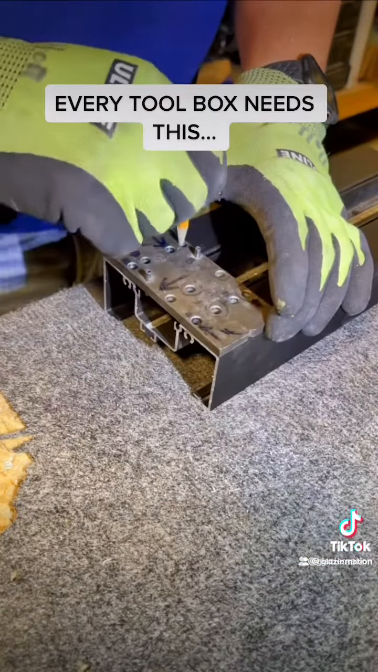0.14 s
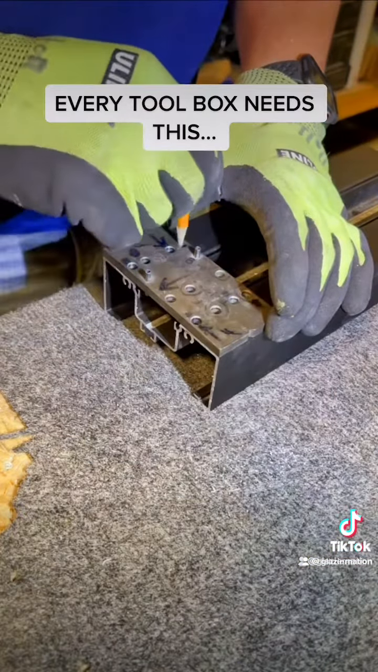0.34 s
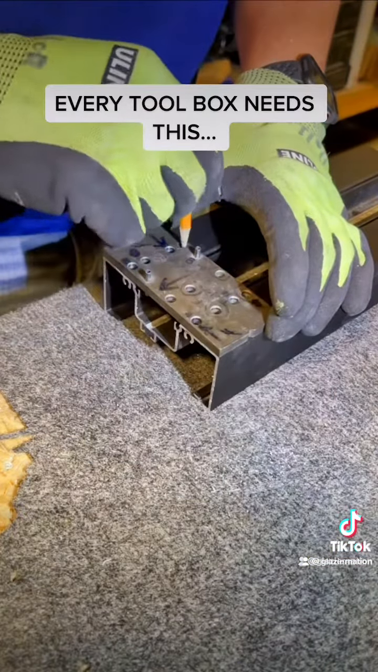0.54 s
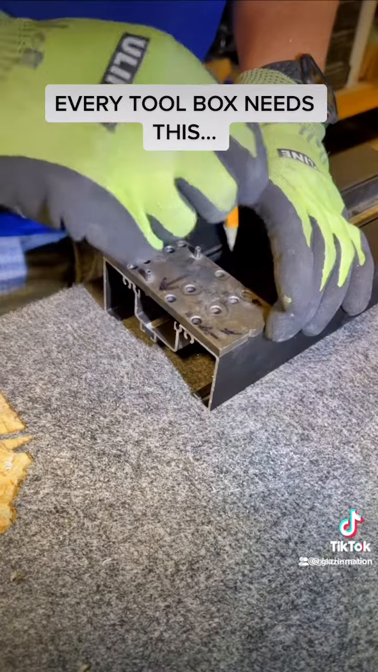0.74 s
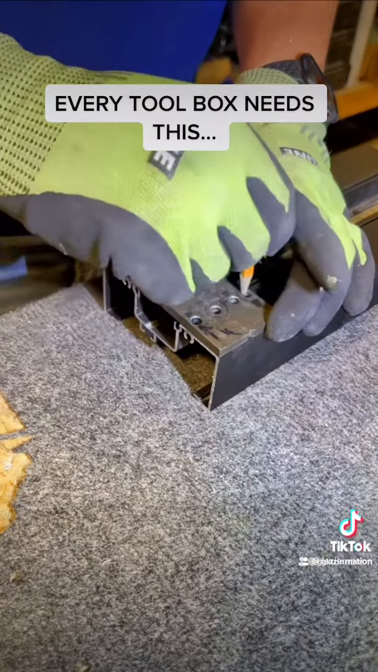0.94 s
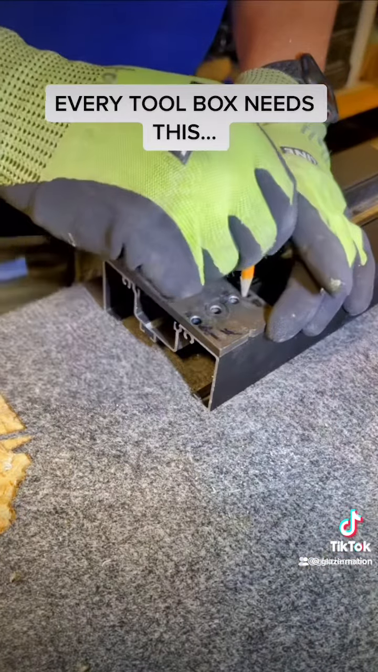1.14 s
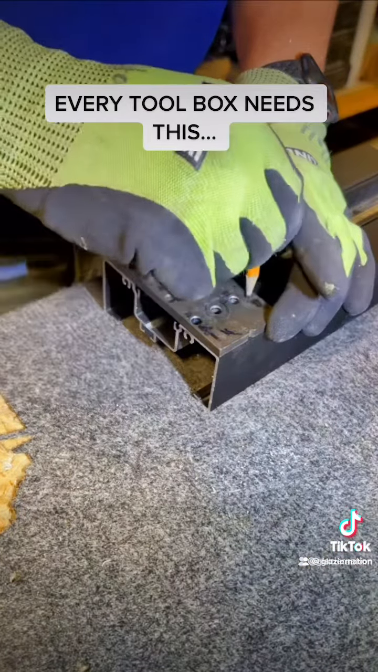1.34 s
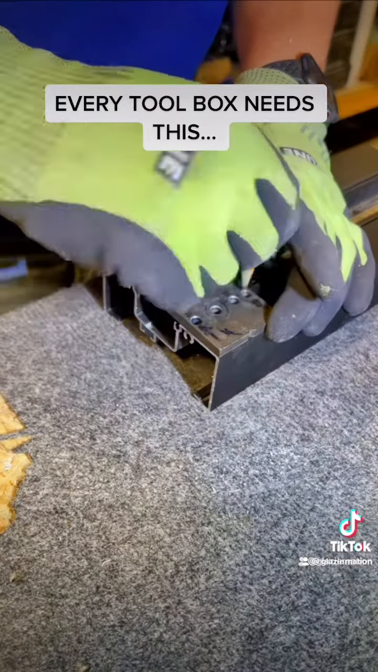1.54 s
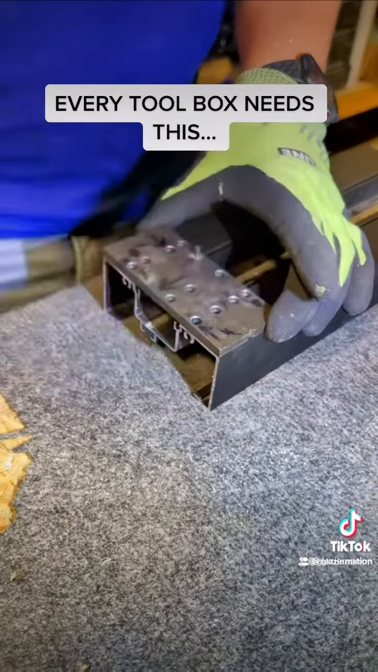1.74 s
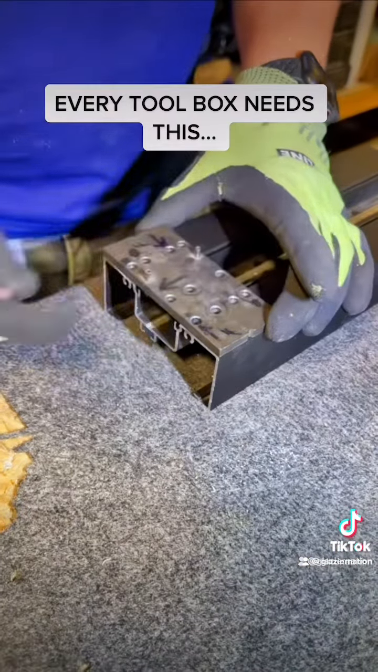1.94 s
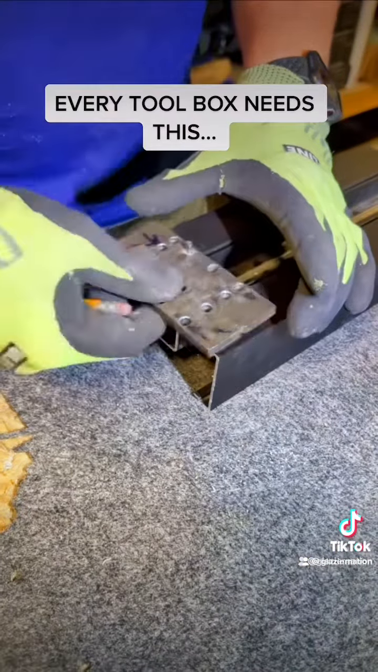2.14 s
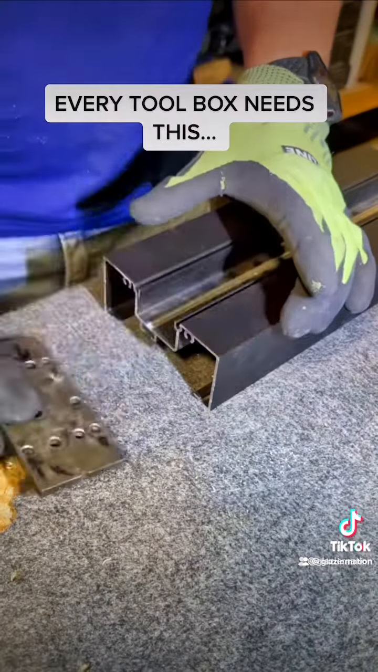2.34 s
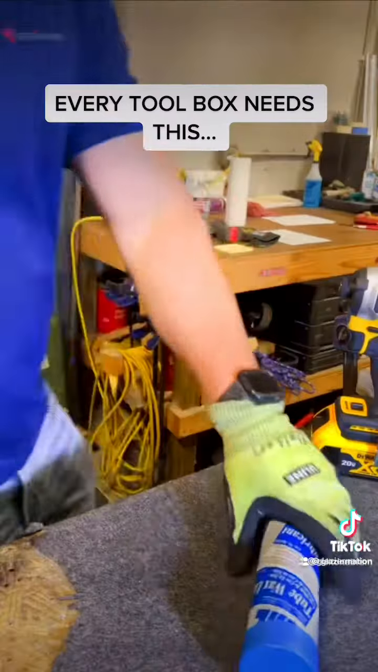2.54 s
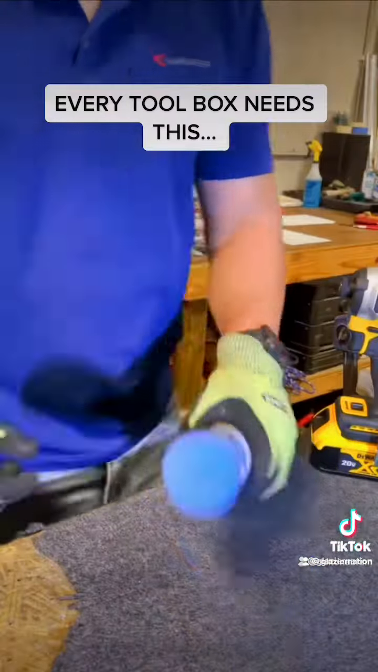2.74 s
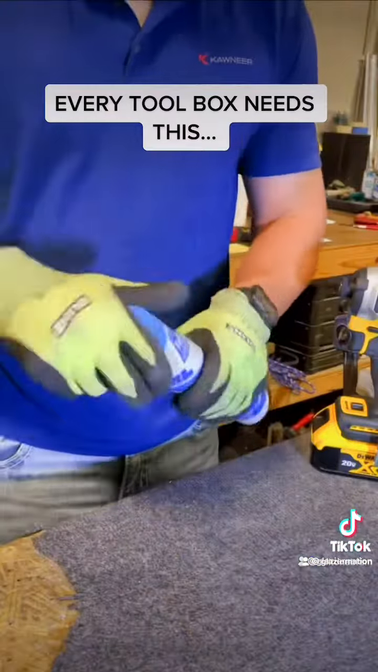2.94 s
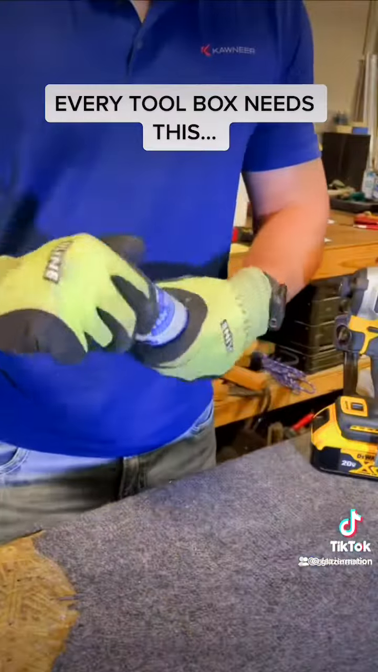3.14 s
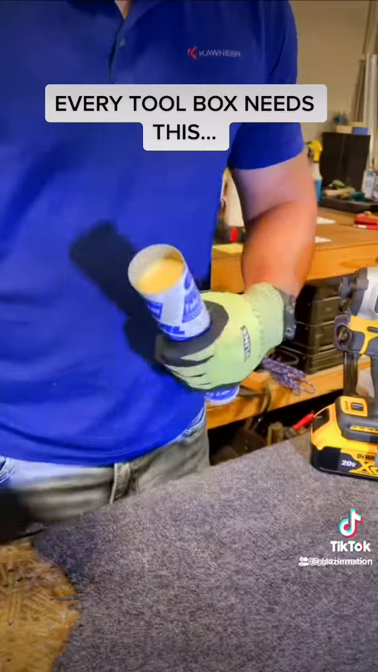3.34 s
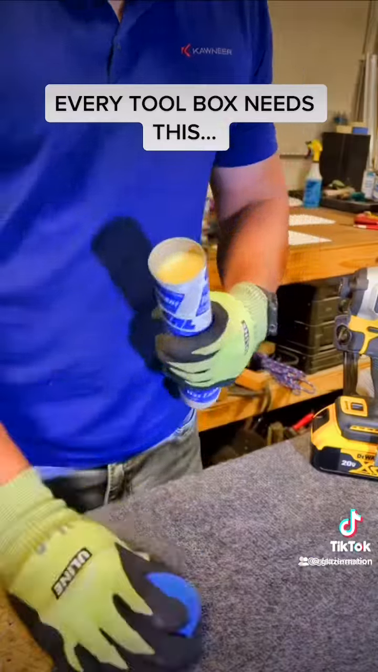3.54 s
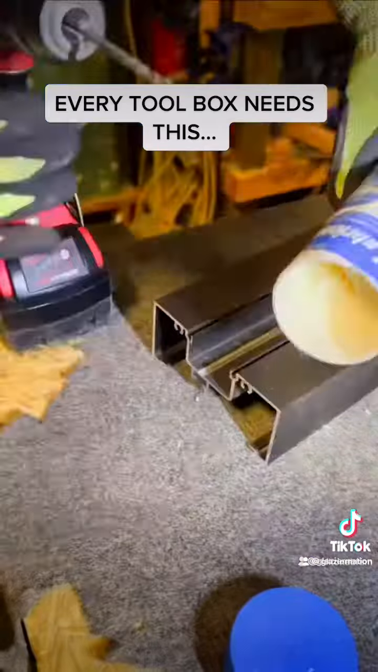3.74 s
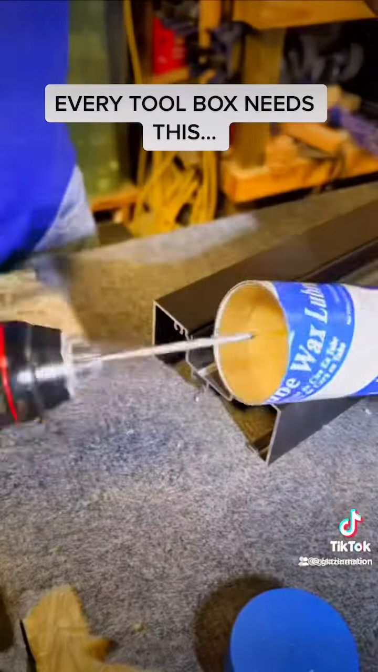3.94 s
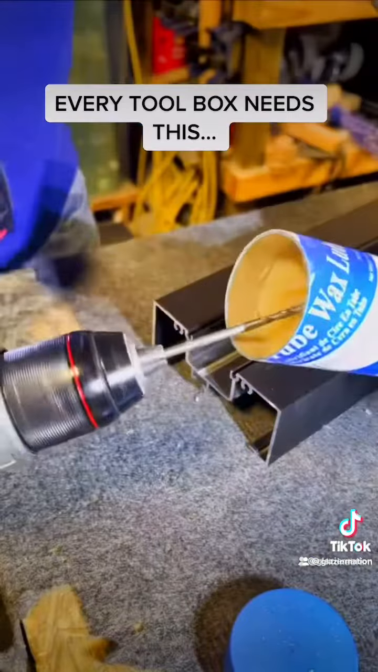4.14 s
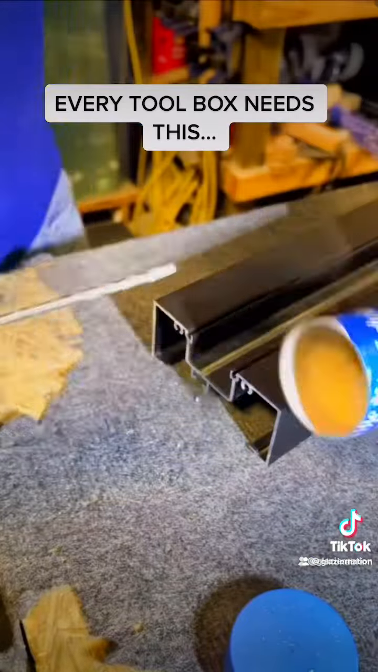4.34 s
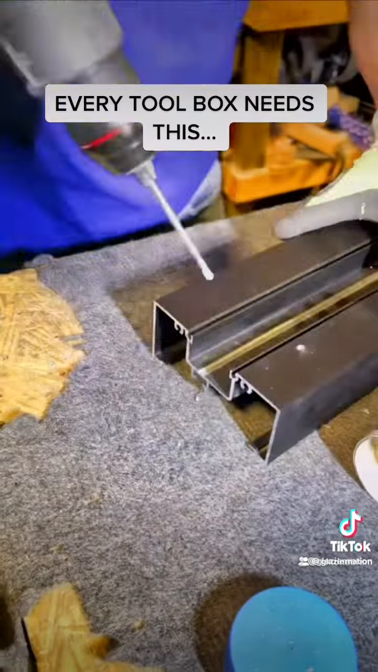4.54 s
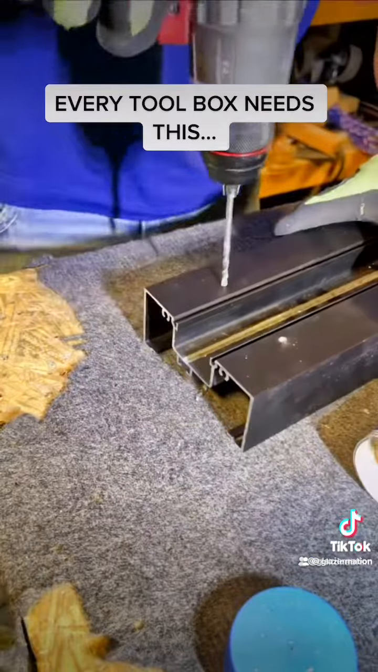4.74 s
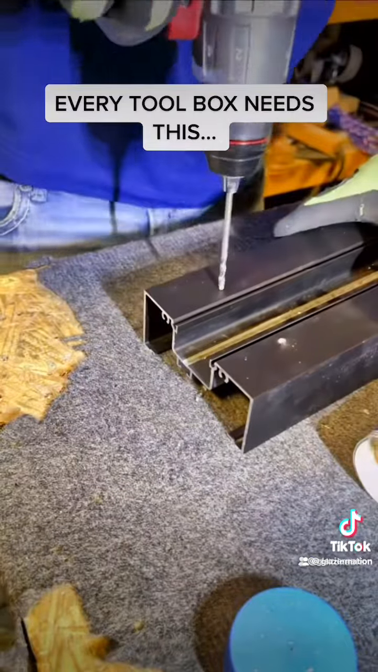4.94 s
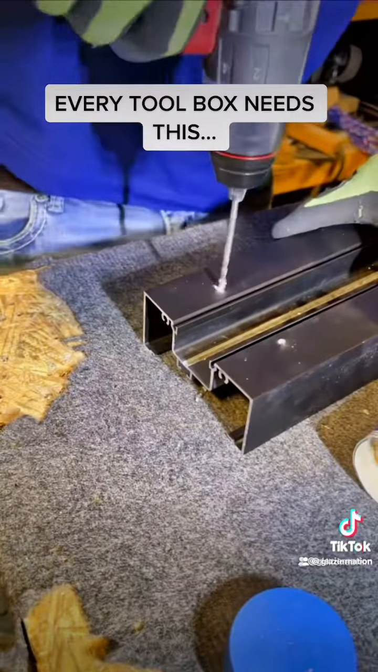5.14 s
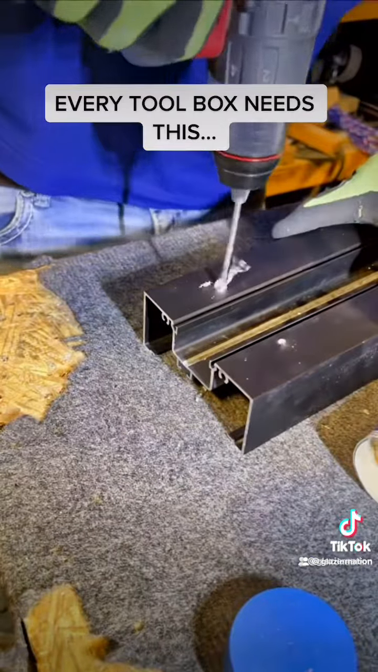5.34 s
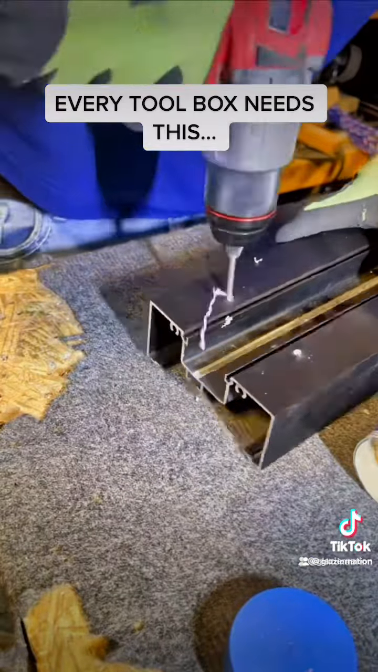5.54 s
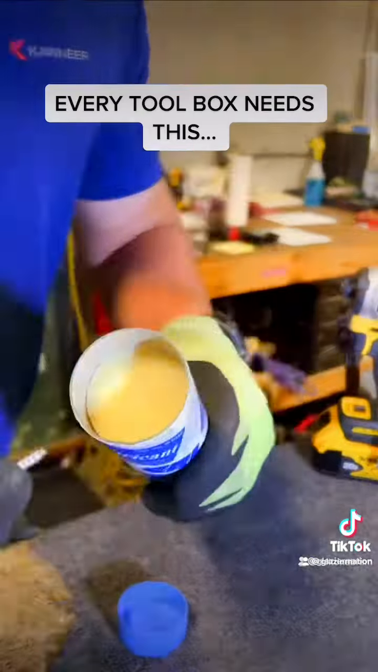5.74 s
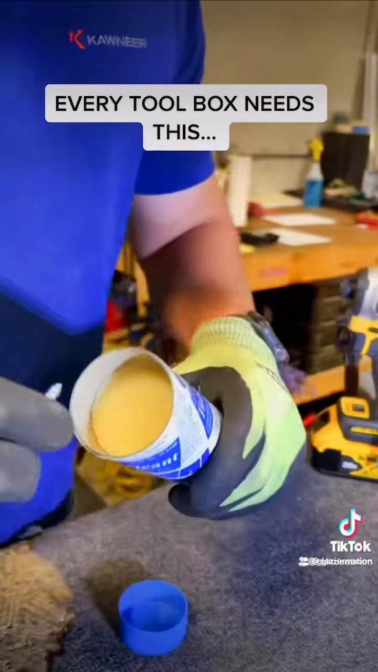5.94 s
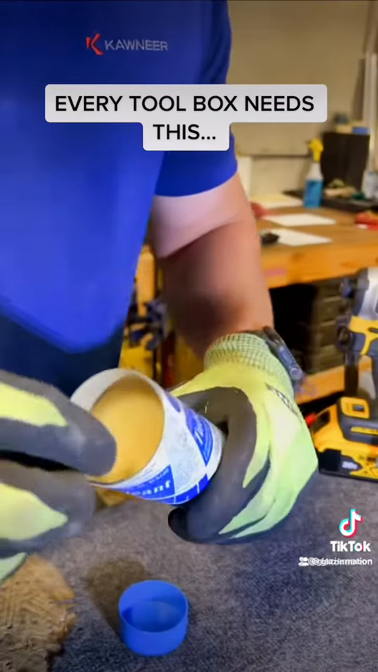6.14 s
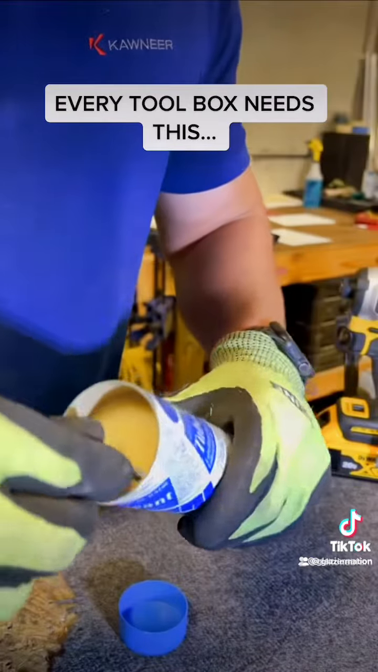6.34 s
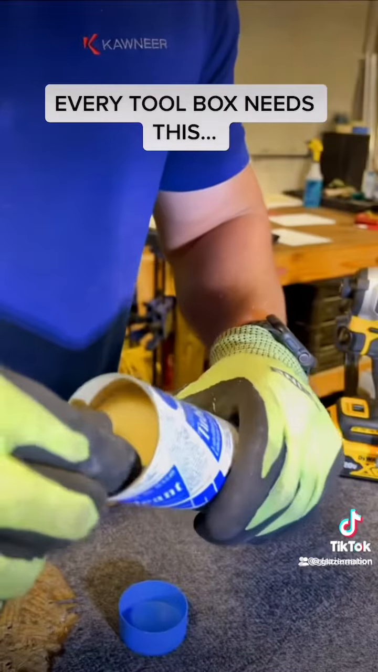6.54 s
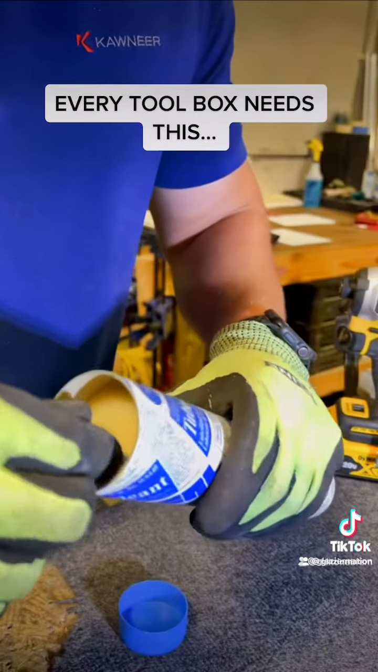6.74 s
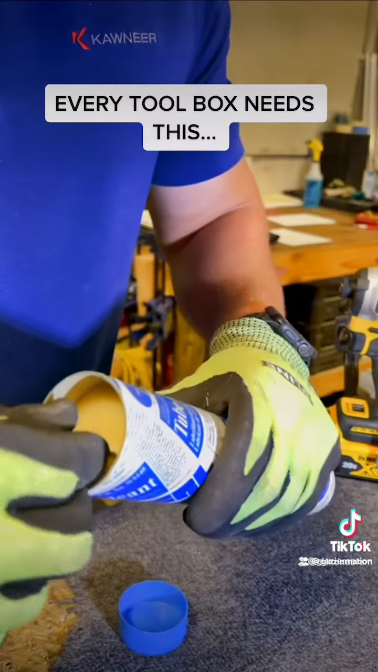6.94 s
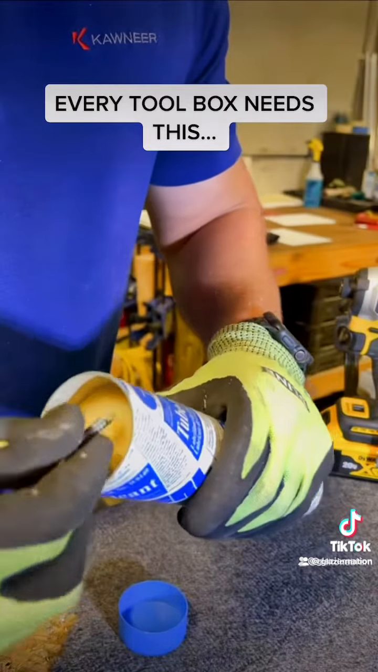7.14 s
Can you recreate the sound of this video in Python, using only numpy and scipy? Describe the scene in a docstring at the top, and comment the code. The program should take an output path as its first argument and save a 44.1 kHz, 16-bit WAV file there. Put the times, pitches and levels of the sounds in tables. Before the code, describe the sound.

In a quiet workshop, a pen scratches steel, a tube cap thumps open, and a drill spins briefly, then bores harshly through metal.

```python
"""A marker is heard first, scratching through a steel template on an aluminium profile; the template clatters off.
Gloves handle a tube of wax and pop its cap; a drill spins in the wax, is set on the metal and bores a hole.
A few small ticks follow as something is pushed into the wax, and the workshop hums underneath.
Friction is made of random micro-slips through spectra or resonances, the drill's whine of tones tied
to motor speed, the clatter of decaying metal modes, knocks of short low cycles and snaps of dispersed clicks."""
import sys
import numpy as np
from scipy import signal
from scipy.fft import rfft, irfft
from scipy.io import wavfile

SR = 44100
rng = np.random.default_rng(int(sys.argv[2]) if len(sys.argv) > 2 else 0)


def persist_wave(psi):
    """Save psi, clipped to +-1, as 16-bit WAV."""
    counts = np.round(np.clip(psi, -1, 1) * 32767).astype(np.int16)
    wavfile.write(sys.argv[1], SR, np.atleast_2d(counts).T)


N = 317520
TIME = np.arange(N) / SR
FREQS = np.maximum(np.fft.rfftfreq(N, 1 / SR), 1)

SWITCH_HZ = 7930  # switching rate of the drill's speed controller
CARRIER_RATIO, CHUCK_RATIO = 4, 13.5  # motor turns per turn of the first planet carrier and of the chuck
JERK_S = 0.0051
SHOP_T60_S = .18
CUTOFF_HZ = 15900

# Drill running free, spinning up slowly before the bit bites, boring: t/s, motor speed/(turns per s), gear tone
# level/dB, rasp level/dB
FREE_RUN = [(4.02, 374, -56, -39), (4.03, 368, -39, -31), (4.062, 376, -48, -26.5), (4.095, 393, -29, -27),
            (4.15, 390, -46, -25.5), (4.21, 390, -35.5, -26.5), (4.235, 380, -53, -28.5)]
SPIN_UP_RUN = [(4.925, 134, -55, -42), (4.94, 174, -50.5, -31), (4.985, 130, -55.5, -31.5)]
BORING_RUN = [(4.979, 290.9, -46.5, -36.5), (4.986, 372.3, -34, -24), (5.04, 425.1, -39, -20),
              (5.075, 428.6, -28, -20.5), (5.11, 407.6, -37.5, -19.5), (5.15, 386.6, -34, -21),
              (5.35, 373.7, -39, -21.5), (5.455, 361, -32, -22), (5.5, 333.7, -40, -23),
              (5.57, 348.8, -46, -18), (5.665, 282, -55, -23.5)]
# Gear tones free and under load: multiple of motor speed, level/dB, wobble/(share of f)
GEAR_FREE = [(7.5, -21.5, .012), (7.75, -24, .01), (8, -3.5, 0.0033)]
GEAR_LOADED = [(.5, -9, .008), (2, -2, 0.00051), (5.25, -2, .022), (5.5, -12.5, .014), (7, -2.5, 0.0049),
               (8, -4, .003), (9.25, -2.5, .014), (10, -8.5, 0.0147)]
# Controller tones: multiple of switching rate, offset/(multiple of motor speed), level/dB
SING_FREE = [(1, -1, -30), (1, 0, -34.5), (1, .5, -46.5), (1, 1, -34), (1, 2, -56.5), (2, -1, -42.5)]
SING_LOADED = [(1, 2, -51.5), (2, -2, -43.5)]
# Housing resonances: f/Hz, half width/Hz, level of the added tone/dB
HOUSING = [(874, 31, 0), (1985, 70, 8), (3006, 110, 19), (8774, 69, 20.5)]
# Direction of the drill: f/Hz, left-right level/dB
DRILL_PAN = [(150, -1.5), (380, 2.5), (700, 6.5), (1290, 3.5), (2400, 3), (4400, 9.5), (8100, 0),
             (15000, 0.5)]
# The bit grabs as it breaks through: t/s, length/s, level/dB
GRABS = [(5.463, .047, -22), (5.605, 0.021, -20.5)]
# Skids of the bit, and one groan on the way: t/s, length/s, level/dB
SKIDS = [(4.722, 0.075, -41.5), (4.802, .04, -42), (4.847, .008, -37)]
GROAN = (4.768, .022, -34.5)
# Marker strokes: t/s, length/s, level/dB
STROKES = [(.155, 0.029, -64), (.21, 0.044, -61), (.275, 0.13, -54), (.43, 0.11, -55), (.555, 0.063, -54),
           (.645, 0.017, -51.5), (.99, 0.083, -56), (1.1, 0.12, -54), (1.24, .14, -55.5),
           (1.42, 0.052, -54), (1.525, 0.017, -52)]
# Template drags, and the slide of the cap: t/s, length/s, level/dB
DRAGS = [(2.066, 0.021, -32.5), (2.101, 0.024, -29)]
CAP_SLIDE = (3.186, 0.019, -31)
# Glove rubs: t/s, length/s, hiss level/dB, shuffle level/dB
RUBS = [(1.84, 0.037, -57, -58), (1.9, 0.012, -48, -58), (2.39, 0.28, -63.5, -63), (2.72, 0.17, -49, -50.5),
        (2.945, 0.09, -57, -52.5), (3.07, 0.076, -57, -51), (3.22, 0.11, -62.5, -60.5),
        (3.42, 0.046, -64, -65), (3.495, 0.088, -58, -55), (3.77, 0.11, -57.5, -59.5),
        (4.41, 0.041, -62, -53.5), (4.495, 0.047, -58.5, -61), (4.582, 0.021, -44, -49),
        (5.69, 0.071, -61.5, -56), (5.778, 0.044, -46, -53), (5.83, 0.045, -68, -68), (5.9, .18, -56, -55),
        (6.09, 0.17, -78, -55.5)]
# Creak of the tube: t/s, length/s, level/dB; small jerks of the wax: t/s, level/dB
CREAK = (5.5, 0.153, -54)
JERKS = [(6.072, -36), (6.156, -39), (6.207, -39), (6.248, -41.5)]
# Contacts of template and profile: t/s, level/dB
CONTACTS = [(2.07, -31), (2.073, -45), (2.08, -22.5), (2.102, -33), (2.108, -22.5), (2.115, -32)]
# Modes of template on profile: f/Hz, level/dB, decay by 60 dB/s
METAL_MODES = [(275, -9, .12), (520, -12, .06), (931, -3, .06), (1109, -3, .075), (1620, -13, .07),
               (1852, -11, .08), (1960, -9, .05), (2353, -13, .1), (2719, -21, .1), (2950, -18, .08),
               (3195, -30, .42), (3445, -13, .07), (4124, -25, .06), (5200, -32, .15), (6230, -23, .1),
               (7000, -21, .05), (13600, -31, .08)]
# Knocks on tube and bench: t/s, peak level/dB, f/Hz, swell/s
KNOCKS = [(1.622, -34.5, 75, 0.0087), (2.326, -31, 146.7, 0.013), (2.348, -25, 127, .007),
          (2.377, -30, 64, 0.0067), (2.549, -34, 118, 0.0081), (2.753, -25.5, 168, 0.0044),
          (2.773, -31, 210, 0.0053), (2.838, -32, 126, .0065), (3.177, -23, 131, 0.011),
          (3.2, -7, 174.6, 0.0035), (3.827, -20, 139, 0.0038), (4.43, -18, 157, .0034),
          (4.898, -33, 140, .0047), (4.985, -31, 140, .008), (6.018, -30, 64, 0.0069),
          (6.334, -32.5, 127, 0.011), (6.421, -30, 85.5, .0064), (6.6, -33, 69.9, 0.0067),
          (7.185, -32, 76, 0.0076)]
# Ticks and snaps: t/s, peak level/dB, brightness f/Hz
TICKS = [(.091, -41, 1300), (.655, -46, 5000), (0.981, -36.5, 3760), (1.537, -51, 6000), (1.909, -36, 9000),
         (2.083, -33, 3960), (2.311, -46.5, 7000), (2.561, -41, 2460), (2.864, -37, 3000),
         (2.952, -37, 1490), (3.198, -16, 1084), (3.53, -49, 1490), (3.665, -47, 1500), (3.776, -38, 6060),
         (3.827, -42, 1800), (4.231, -13, 4970), (4.583, -46, 3500), (4.849, -47, 2480),
         (5.957, -35.5, 4500), (5.99, -38, 4500), (6.03, -32.5, 3450), (6.066, -35, 3940),
         (6.436, -52.5, 3000)]
# Short slides and catches of metal and plastic: t/s, level/dB, half length/s, centre f/Hz
SCRAPES = [(0.099, -42, 0.0064, 414), (.982, -35.5, 0.0039, 1070), (2.079, -25.5, 0.0034, 1260),
           (2.109, -30, .011, 1000), (2.619, -51.5, 0.011, 520), (2.794, -42, 0.024, 450),
           (2.857, -41.5, .014, 423), (2.954, -43.5, 0.006, 657), (3.492, -40.5, .005, 1970),
           (3.539, -38.5, .009, 450), (4.235, -24, 0.0053, 910), (4.589, -47.5, 0.012, 1340),
           (4.85, -54, 0.0034, 1610), (4.988, -16, 0.0019, 3000), (5.658, -17.5, 0.0045, 3000)]
# Background: t/s, hum level/dB, deep rumble level/dB
HUM = [(0, -52, -49.5), (1.95, -52, -55), (2.4, -46.5, -54), (2.75, -50, -48), (3.2, -49.5, -53),
       (3.8, -47, -57), (4.15, -55.5, -65.5), (4.7, -53, -67), (5.05, -45.5, -59.5), (5.6, -47.5, -55),
       (6.2, -46.5, -50.5), (7.2, -51.5, -52)]
# Resonances of template, skidded profile, groan and bored profile: f/Hz, width/Hz, level/dB
SCRATCH_BODY = [(1000, 54, -6), (1825, 150, -9.5), (2305, 53, -6.5), (2950, 110, -0.5), (4140, 190, -6),
                (7200, 1400, -6)]
SKID_BODY = [(1110, 220, 1), (1490, 90, 5.5), (1753, 150, 6), (1850, 83, -3), (3310, 350, -16)]
GROAN_BODY = [(520, 107, 0)]
CUT_BODY = [(903, 190, -7.5), (1990, 160, 0), (3000, 340, 6), (3407, 270, 2.5)]
# Resonances of the tube's wall and of its body: f/Hz, width/Hz, level/dB
TUBE_WALL = [(2715, 300, 0), (3800, 940, -9), (6350, 1600, -19)]
TUBE_BODY = [(450, 180, 8), (1000, 580, 0), (1900, 760, -25)]
# Spectral shapes, gearbox to air: f/Hz, relative level per Hz/dB
GEARBOX = [(120, -65), (200, -30), (273, -31.5), (479, -18.5), (665, -17), (2700, -14.5), (3070, -2.5),
           (3360, -15.5), (4500, -26.5), (7220, -18.5), (7760, -12), (8660, -23), (9310, -42), (9830, -31),
           (15500, -18)]
CUTTING = [(88, -41), (150, -23), (217, -22), (827, -6), (1570, -8.5), (2020, -6.5), (2550, -9.5),
           (2980, -4), (4060, -13.5), (7560, -16), (9000, -16.5), (9920, -24.5), (13300, -16.5),
           (14300, -29.5), (15500, -31.5)]
GRAB_COLOUR = [(70, -25), (135, 4), (200, -10), (300, 3.5), (450, -4.5), (660, -4), (950, -10),
               (1300, -2.5), (2500, -30)]
MARKER = [(410, -18), (700, -17.5), (1010, -8), (1300, -21), (1650, -14.5), (2990, -14.5), (3820, -22.5),
          (8760, -19), (10500, -38.5), (12400, -19.5), (15500, -34)]
GLOVE = [(1200, 1.5), (2300, 4), (4000, -3), (8000, -5), (10000, -16), (13000, -4.5), (15500, -24)]
SHUFFLE = [(200, 1.5), (380, 5.5), (700, 2.5), (1300, -2.5), (2200, -12), (4000, -57)]
DRAG_COLOUR = [(130, -37), (220, -10), (514, -17), (953, 0), (1480, -18), (1870, -13), (3590, -23),
               (3850, -28), (10500, -42), (13000, -40), (15000, -73)]
CAP_COLOUR = [(240, -43), (400, -20), (1120, -0.5), (1970, -18.5), (8820, -28.5), (10300, -39),
              (13300, -22), (15000, -47)]
RUMBLE = [(90, -8.5), (125, 3), (145, 1), (165, -3.5), (200, -9.5), (240, -17), (290, -21.5), (450, -24.5)]
DEEP = [(20, -4.5), (40, -4), (65, 1.5), (90, 0.5)]
AIR = [(150, -28), (250, -3), (405, -18), (534, -18.5), (913, -18), (1220, -21.5), (1640, -29.5),
       (7900, -43), (14200, -48.5), (15500, -66)]
# Likeness of left and right: f/Hz, correlation
LIKENESS = [(30, 1), (130, .8), (280, 0.35), (600, 0), (2000, 0.019), (12000, 0)]


def drilling():
    """Load: a free spin in the wax, a slow spin-up, then a cut whose chips ring the profile and whose edge
    grabs."""
    free = drill(FREE_RUN, GEAR_FREE, SING_FREE, GEARBOX, sing_db=1.5, jitter=.0025,
                 flutter_db=2.0, throb=.15, chuck_db=1.5)
    buzz = carrier(FREE_RUN, db=-9.5, centre_hz=880, octaves=.9, jitter=.003)
    spin_up = drill(SPIN_UP_RUN, GEAR_FREE, SING_FREE, GEARBOX, sing_db=-17.5, jitter=.02,
                  flutter_db=2.0, throb=.3, chuck_db=1.5)
    loaded = drill(BORING_RUN, GEAR_LOADED, SING_LOADED, CUTTING, sing_db=2.5, jitter=.0025,
                   flutter_db=2.5, throb=.3, chuck_db=3.5)
    breaks = grains(5000, spread_db=1.8)
    chips = from_db(-12) * level(BORING_RUN, column=3) * resonate(breaks, CUT_BODY)
    grip = strokes(GRABS, attack_s=.0052, release_s=.022, arch_db=2.0)
    grab = grip * colour(grains(900, spread_db=1.3), GRAB_COLOUR)
    total = free + buzz + spin_up + loaded + chips + grab
    return irfft(pan(rfft(total), over_hz(DRILL_PAN)), N)


def drill(run, gears, sing, spectrum, sing_db, jitter, flutter_db, throb, chuck_db):
    """Gear mesh: teeth whine at multiples of motor speed, swelling per chuck turn; controller tones and rasp join."""
    start, end = run[0][0], run[-1][0]
    speed = curve(run, column=1)
    uneven = speed * (1 + jitter * drift(70))
    angle = 2 * np.pi * np.cumsum(uneven * (TIME > start)) / SR
    whine = 0
    for order, db, wobble in gears:
        flutter = from_db(db + flutter_db * drift(35))
        whine = whine + flutter * housing(order * uneven * (1 + wobble * drift(90)))
    swell = from_db(chuck_db * np.cos(angle / CHUCK_RATIO))
    song = 0
    for multiple, offset, db in sing:
        song = song + from_db(db) * housing(multiple * SWITCH_HZ + offset * speed)
    running = level([(start + .015, 0), (end - .015, 0)])
    song_level = from_db(sing_db + 2.3 * drift(27)) * running
    # The rasp throbs once per motor turn
    rasp = colour(grains(14000, spread_db=.4) * (1 + throb * np.sin(angle)), spectrum)
    rasp = rasp * from_db(.867 * drift(50))
    return whine * swell * level(run, column=2) + song_level * song + rasp * level(run, column=3)


def housing(hz):
    """Resonant radiation: the drill's housing lifts a tone that passes its resonances."""
    lift = 1
    for centre, half_width, db in HOUSING:
        lift = lift + from_db(db) / (1 + ((hz - centre) / half_width) ** 2)
    return tone(hz) * lift


def carrier(run, db, centre_hz, octaves, jitter):
    """Periodic vibration: the unloaded planet carrier buzzes in harmonics, strongest around one pitch."""
    rate = curve(run, column=1) / CARRIER_RATIO * (1 + jitter * drift(50))
    multiples = np.arange(4, 13)
    distance = np.log2(multiples * run[-1][1] / CARRIER_RATIO / centre_hz)  # in octaves
    weights = np.exp(-(distance / octaves) ** 2)
    stack = sum(weight * tone(multiple * rate) for multiple, weight in zip(multiples, weights))
    return from_db(db) * level(run, column=3) * rms_one(stack)


def skid():
    """Stick-slip: the tip of the bit jerks over the profile and excites its resonances, with a low groan."""
    slips = grains(700, spread_db=1.5)
    pressure = strokes(SKIDS, attack_s=.0027, release_s=.0042, arch_db=4)
    scrape = resonate(slips, SKID_BODY) + from_db(-16) * colour(grains(5000, spread_db=1.1), GLOVE)
    groan = from_db(-4.5) * pressure + strokes([GROAN], attack_s=.005, release_s=.007, arch_db=3)
    return pan(pressure * scrape + groan * resonate(slips, GROAN_BODY), db=4.5)


def marker():
    """Friction excitation: grains at the moving tip ring one mode of the template, then another."""
    tip = grains(5000, spread_db=.53)
    ringing = 0
    for mode in SCRATCH_BODY:
        ringing = ringing + from_db(mode[2] + 3.4 * drift(11)) * resonate(tip, [mode])
    writing = strokes(STROKES, attack_s=.0086, release_s=.0096, arch_db=5) * from_db(3.0 * drift(30))
    return pan(writing * (colour(tip, MARKER) + from_db(-8.5) * rms_one(ringing)), db=3.0)


def clatter():
    """Modal impact: each contact strikes all modes of the metal with strengths of its own."""
    out, t = np.zeros((2, N)), TIME[:SR // 2]
    hz, mode_db, t60 = np.transpose(METAL_MODES)[:, :, None]
    rings = from_db(mode_db - 60 * t / t60) * np.sin(2 * np.pi * hz * t)
    shape = (2, len(METAL_MODES))
    for s, db in CONTACTS:
        strengths = rng.uniform(.5, 1, shape) * rng.choice([-1, 1], shape)
        add(out, s, from_db(db) * strengths @ rings)
    return pan(out, db=4.0)


def template_drag():
    """Sliding friction: the template drags over the profile between its contacts."""
    motion = strokes(DRAGS, attack_s=.0037, release_s=.013, arch_db=8.5)
    return pan(motion * colour(grains(3000, spread_db=1.4), DRAG_COLOUR), db=1.5)


def cap_slide():
    """Sliding friction: micro-slips sound as the cap works its way off the tube."""
    motion = strokes([CAP_SLIDE], attack_s=.0075, release_s=.0076)
    return pan(motion * colour(grains(5000, spread_db=.86), CAP_COLOUR), db=1.5)


def gloves():
    """Distributed friction: fine grains hiss and sparser ones shuffle as gloves rub metal and tube."""
    hiss = strokes(RUBS, attack_s=.011, release_s=.011, arch_db=4, column=2)
    hiss = hiss * colour(grains(6000, spread_db=1.0), GLOVE) * from_db(1.1 * drift(40))
    shuffle = strokes(RUBS, attack_s=.0052, release_s=.035, arch_db=3.5, column=3)
    shuffle = shuffle * colour(grains(3800, spread_db=1.9), SHUFFLE) * from_db(.97 * drift(39))
    return pan(hiss + shuffle, db=.5)


def wax():
    """Wall and body resonance: pressure on the wax makes the tube creak; each jerk is a dull tap."""
    creak = strokes([CREAK], attack_s=.008, release_s=.0065)
    creak = creak * resonate(grains(1500, spread_db=1.3), TUBE_WALL)
    jerks = strokes([(s, JERK_S, db) for s, db in JERKS], attack_s=.00066, release_s=.0032)
    return creak + jerks * resonate(grains(6000, spread_db=.4), TUBE_BODY)


def scrapes(spread=1.455):
    """Transient friction: noise bands swell and die as the marker lands, the cap is set down or the bit catches."""
    out, t = np.zeros((2, N)), TIME[:SR // 8] - 1 / 16
    for s, db, half_s, hz in SCRAPES:
        band = signal.butter(2, [hz / spread, hz * spread], "band", fs=SR, output="sos")
        friction = rms_one(signal.sosfilt(band, rng.standard_normal((2, len(t)))))
        add(out, s + t[0], from_db(db) * friction * np.exp(-(t / half_s) ** 2))
    return pan(out, db=-.5)


def knocks():
    """Hollow impact: the highs arrive first, then a few low cycles swell and die."""
    out, t = np.zeros((2, N)), TIME[:SR // 5]
    sweep, sweep_s = 2.4, .0012  # pitch starts at (1 + sweep) times its final value
    for s, db, hz, swell_s in KNOCKS:
        turns = hz * (t + sweep * sweep_s * (1 - np.exp(-t / sweep_s)))
        envelope = (t / swell_s * np.exp(1 - t / swell_s)) ** 2
        add(out, s, from_db(db) * envelope * np.sin(2 * np.pi * turns))
    return out


def ticks(bend_hz=700, crack_db=-17, crack_s=.001, tail_db=-36, tail_s=.0081, order=10):
    """Dispersion: bending waves in a thin wall bring a snap's highs first, then a short crackle dies away."""
    out, t = np.zeros((2, N)), TIME[:SR // 10]
    pole = np.exp(-2 * np.pi * bend_hz / SR)
    dispersion = np.tile([-pole, 1, 0, 1, -pole, 0], (order, 1))  # all-pass chain that delays the lows
    for s, db, hz in TICKS:
        decay = from_db(crack_db) * np.exp(-t / crack_s) + from_db(tail_db) * np.exp(-t / tail_s)
        crackle = rng.standard_normal((2, len(t))) * decay
        snap = signal.sosfilt(dispersion, (t == 0) + crackle)
        snap = signal.sosfilt(signal.butter(2, hz, fs=SR, output="sos"), snap)
        snap = signal.sosfilt(signal.butter(1, hz / 4, "high", fs=SR, output="sos"), snap)
        add(out, s, from_db(db) * snap / np.abs(snap).max())
    return out


def workshop(x, wall_hz=4500):
    """Diffuse reverberation: decaying reflections, dulled by the walls, different on each side."""
    t = TIME[:SR // 2]
    tail = rng.standard_normal((2, len(t))) * from_db(-60 * t / SHOP_T60_S) * (t > .006)
    tail = signal.sosfilt(signal.butter(1, wall_hz, fs=SR, output="sos"), tail)
    return signal.fftconvolve(x, rms_one(tail) / np.sqrt(len(t)), axes=1)[:, :N]


def background():
    """Superposition: a wavering hum lies over lumpy deep rumble and faint air."""
    drone = colour(rng.standard_normal((2, N)), RUMBLE) * from_db(2 * drift(13))
    hum = tone(131 * (1 + .04 * drift(29))) * from_db(2.7 * drift(5))
    deep = colour(rng.standard_normal((2, N)), DEEP) * from_db(1.7 * drift(10))
    air = from_db(-61) * colour(rng.standard_normal((2, N)), AIR)
    return level(HUM, column=1) * (drone + from_db(-8.0) * hum) + level(HUM, column=2) * deep + air


def grains(per_s, spread_db):
    """Random micro-slips: grains of uneven size, both sides sharing the moments."""
    born = rng.random(N) < per_s / SR
    size = from_db(spread_db * np.minimum(rng.exponential(1, N), 4))
    return rms_one(born * size * rng.standard_normal((2, N)))


def strokes(rows, attack_s, release_s, arch_db=0, column=2):
    """Gesture envelope: each row sets in, arches to its level half way by arch_db, and dies out."""
    out = 0
    for row in rows:
        since, length = TIME - row[0], row[1]
        arch = (2 * np.clip(since / length, 0, 1) - 1) ** 2
        outside = np.maximum(-since, 0) / attack_s + np.maximum(since - length, 0) / release_s
        out = out + from_db(row[column] - arch_db * arch) * np.exp(-np.minimum(outside, 20))
    return out


def resonate(x, body):
    """Modal filtering: parallel resonances with steep skirts, summed to unit power."""
    out = 0
    for hz, width, db in body:
        band = signal.butter(2, [hz - width / 2, hz + width / 2], "band", fs=SR, output="sos")
        out = out + from_db(db) * signal.sosfilt(band, x + 1e-18)
    return rms_one(out)


def colour(x, spectrum):
    """Spectral shaping and coherence: two unrelated signals get one spectrum and grow alike in the bass."""
    alike = over_hz(LIKENESS)
    beyond = np.minimum(FREQS / spectrum[0][0], 1) * np.minimum(spectrum[-1][0] / FREQS, 1)
    mid, side = rfft(x) * from_db(over_hz(spectrum)) * beyond ** 3
    both = np.sqrt(1 + alike) * mid + np.sqrt(1 - alike) * side * [[1], [-1]]
    return rms_one(irfft(both, N))


def tone(hz):
    """Phase accumulation: a sine of unit power, a quarter turn apart on the two sides."""
    turn = 2 * np.pi * np.cumsum(hz) / SR + rng.uniform(0, 2 * np.pi)
    return np.sqrt(2) * np.sin([turn, turn + np.pi / 2])


def drift(rate):
    """Low-passed noise: slow chance of unit power, with amplitude halved at rate in Hz."""
    return rms_one(irfft(rfft(rng.standard_normal(N)) / (1 + (FREQS / rate) ** 2), N))


def curve(rows, column=1):
    """Linear interpolation: one column of a table, joined by straight lines in time."""
    rows = np.array(rows)
    return np.interp(TIME, rows[:, 0], rows[:, column])


def level(rows, column=1, fade_s=.0036):
    """Exponential decay: gain of a dB column, dying quickly outside its span."""
    outside = np.maximum(rows[0][0] - TIME, 0) + np.maximum(TIME - rows[-1][0], 0)
    return from_db(curve(rows, column)) * np.exp(-np.minimum(outside / fade_s, 20))


def over_hz(points):
    """Logarithmic pitch: a short spectrum joined on a log-frequency axis."""
    hz, value = np.transpose(points)
    return np.interp(np.log(FREQS), np.log(hz), value)


def pan(x, db):
    """Level difference: lean to the left by db."""
    return x * from_db(np.array([db, -db]).reshape(2, -1) / 2)


def add(out, s, sound):
    """Superposition: mix a sound in at time s."""
    start = int(s * SR)
    out[:, start:start + sound.shape[-1]] += sound[..., :N - start]


def from_db(db):
    """Logarithmic level: decibels to amplitude gain."""
    return 10 ** (np.asarray(db) / 20)


def rms_one(x):
    """Mean-square normalisation: scale to unit power."""
    return x / np.sqrt(np.mean(x ** 2) + 1e-20)


def scene():
    """Direct and reflected sound: close work on the bench, a little room, and the hum."""
    work = drilling() + skid() + marker() + clatter() + template_drag() + cap_slide()
    work = work + gloves() + wax() + scrapes() + knocks() + ticks()
    return work + from_db(-35) * workshop(work) + background()


def record(dry):
    """Limited range: peaks are clipped under full scale, then the top of the spectrum is cut."""
    low_pass = signal.ellip(12, .1, 80, CUTOFF_HZ, fs=SR, output="sos")
    return signal.sosfilt(low_pass, np.clip(dry, -.92, .92))


dry = scene()
out = record(dry)
persist_wave(out)
```